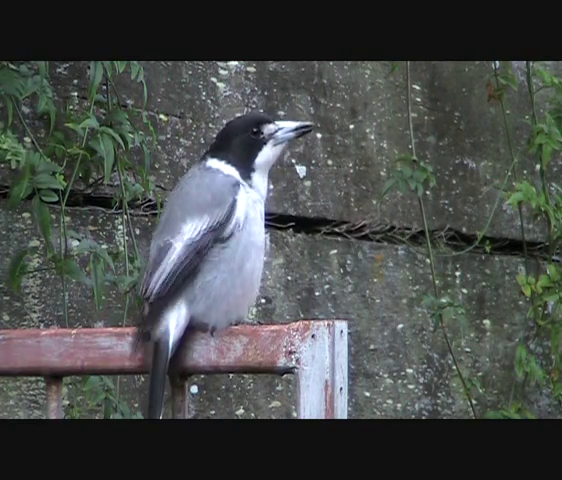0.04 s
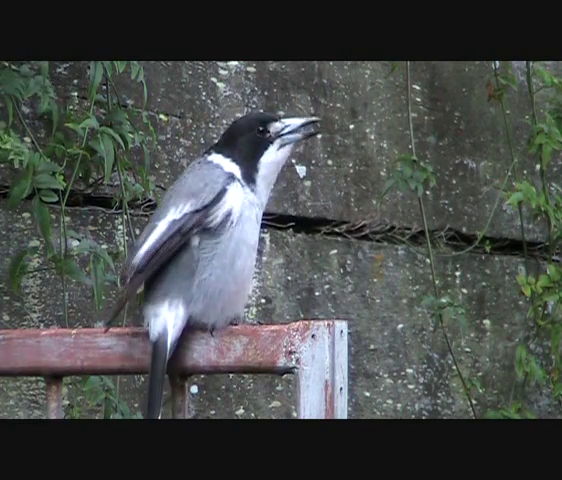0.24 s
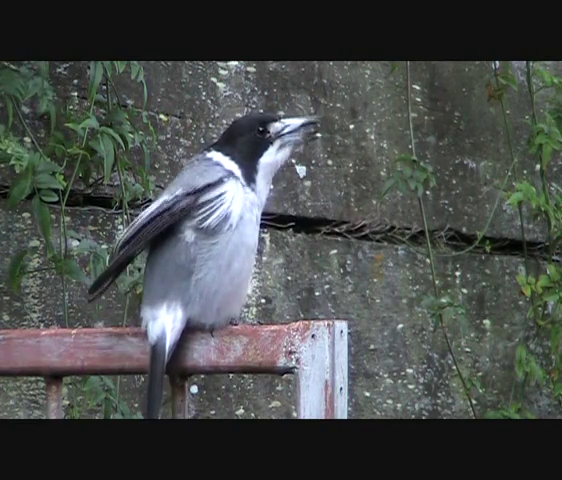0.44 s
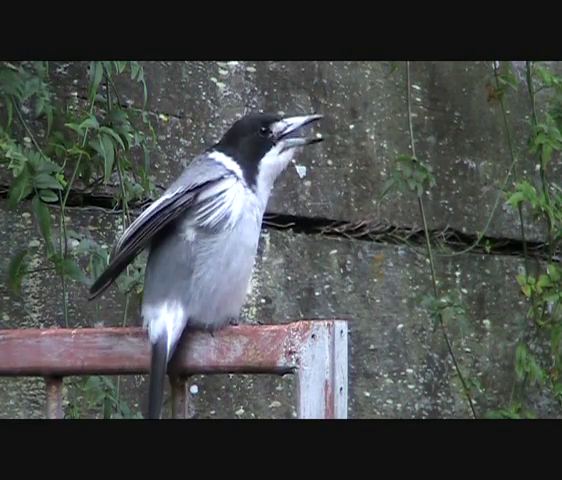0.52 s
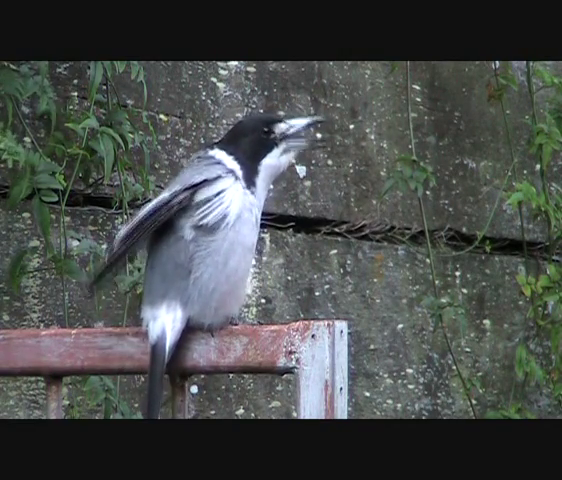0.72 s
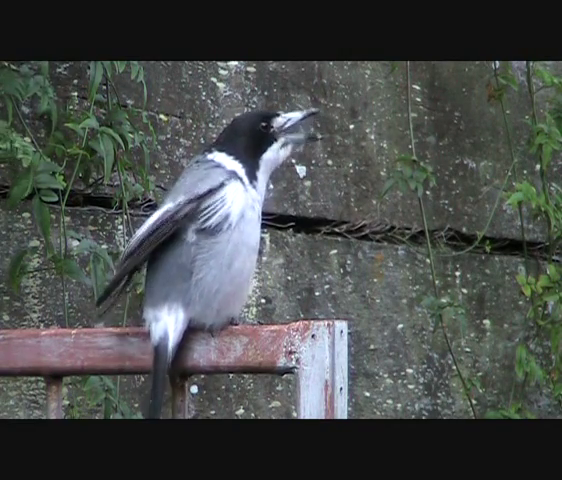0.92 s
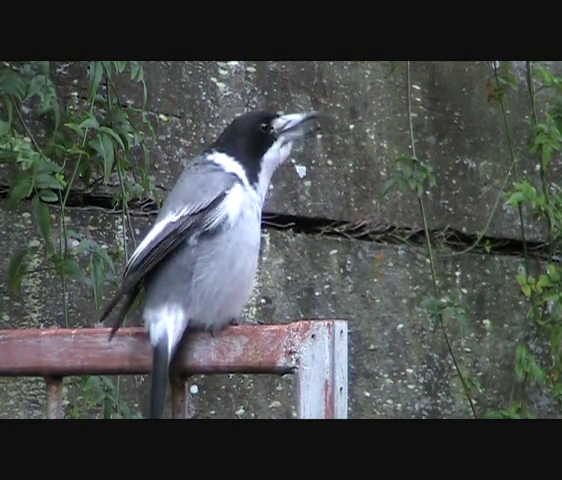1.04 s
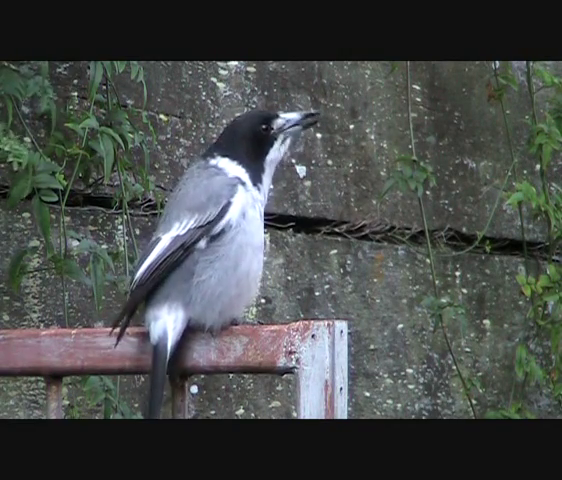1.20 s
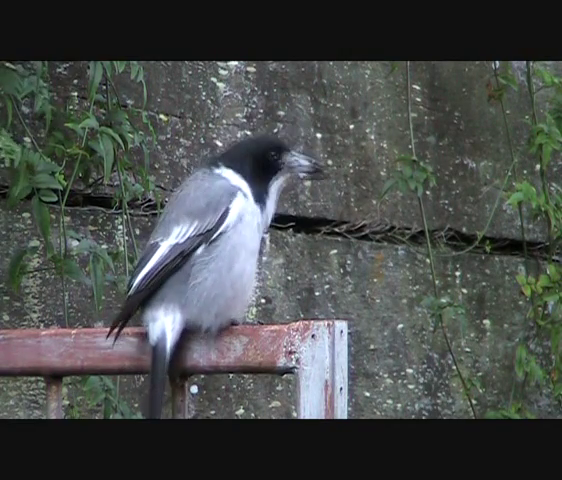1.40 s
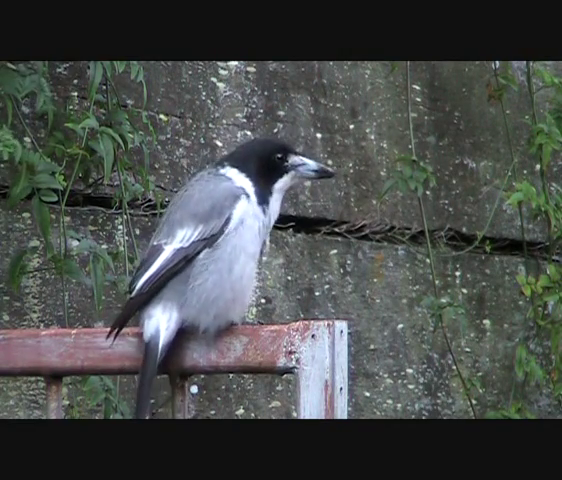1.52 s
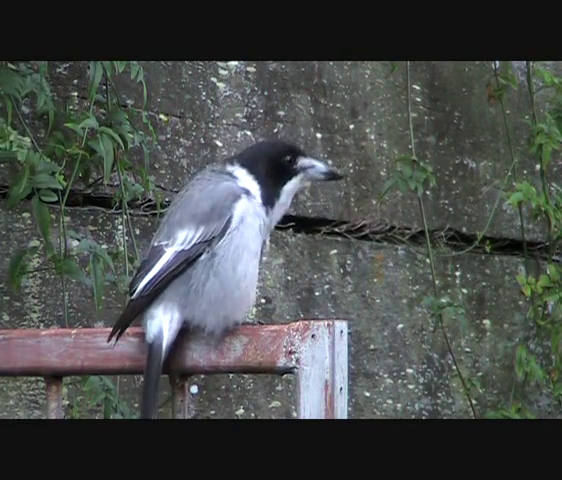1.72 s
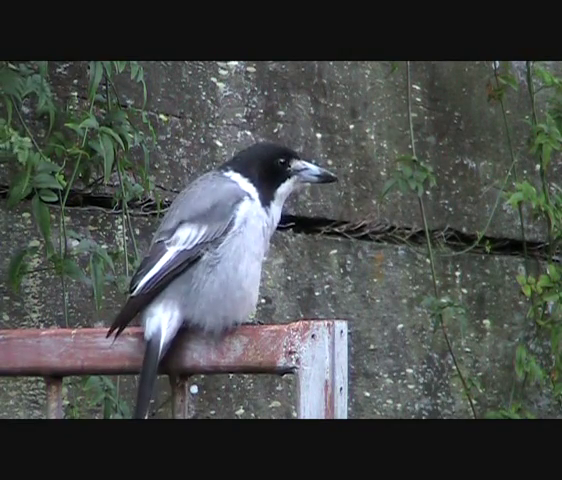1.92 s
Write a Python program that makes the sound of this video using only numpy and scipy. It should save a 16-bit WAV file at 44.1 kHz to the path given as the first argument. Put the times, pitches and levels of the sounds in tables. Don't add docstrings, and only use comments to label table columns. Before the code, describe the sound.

A butcherbird calls a few metres away. A rough rasp climbs from 0.2 to 0.45 seconds, another follows at 0.55 to 0.72, then four sharp, higher yelps run from 0.8 to 1.2. After a pause, a soft low whistle sounds at 1.45 to 1.6, and a higher one at 1.7 falls into a faint chuckle by 1.9. Short wall reflections, leaf hiss, distant traffic rumble and faint whines throughout.

```python
import sys
import numpy as np
from scipy import signal
from scipy.fft import rfft, irfft, next_fast_len
from scipy.io import wavfile
from scipy.ndimage import uniform_filter1d, minimum_filter1d, map_coordinates

SR = 44100
rng = np.random.default_rng(int(sys.argv[2]) if len(sys.argv) > 2 else 0)


def digitize_waveform(pressure):
    field = np.atleast_2d(pressure).T
    bounded = np.clip(field, -1, 1)
    quanta = np.round(bounded * 32767).astype(np.int16)
    wavfile.write(sys.argv[1], SR, quanta)


def boost(x):
    u = np.asarray(x, float) / 20
    return 10 ** u


N = 85995
TOP_HZ = 15770


def unit(x):
    return x / np.sqrt(np.mean(x ** 2) + 1e-20)


def along(points, hz):
    f, v = np.transpose(points)
    return np.interp(np.log(hz + 1), np.log(f + 1), v)


def wobble(rate, size):
    knots = rng.standard_normal(int(size * 2 * rate / SR) + 8)
    return map_coordinates(knots, [np.arange(size) * rate / SR])


def complex_wobble(rate, size):
    return wobble(rate, size) + 1j * wobble(rate, size)


def filtered(x, response):
    m = next_fast_len(x.shape[-1] + 8192)
    return irfft(rfft(x, m) * response(np.fft.rfftfreq(m, 1 / SR)), m)[..., :x.shape[-1]]


def spread(first, second, likeness):
    def shares(hz):
        angle = np.arccos(np.clip(along(likeness, hz), -1, 1)) / 2
        return np.array([np.cos(angle), np.sin(angle)])
    mid, side = filtered(np.array([first, second]), shares)
    return np.array([mid + side, mid - side])


# (time [s], pitch [Hz], level [dB], overtone lift [dB], roughness [0-1])
RASP_1 = [(.2, 616, -38, -15.5, .6), (.226, 639.6, -23.5, -15, .6), (.238, 702.3, -20.5, -6.5, .35),
          (.258, 738.9, -24, -5.5, .3), (.29, 734.8, -18, -4, .22), (.305, 747.9, -15.5, -5, .2),
          (.33, 804.6, -23, 5.5, .6), (.356, 814.1, -13, -2, 0.2), (.375, 814.5, -12, -6.5, .2),
          (.383, 827.3, -16.5, 7, 0.31), (.391, 838.3, -11, 0.5, .2), (.412, 854.9, -10.5, 3.5, 0.4),
          (.426, 888.9, -12, 4, .3)]
RASP_1_END = [(.424, 1064, -15, 1.5, 0.33), (.432, 1070, -16, 1.8, 0.187), (0.446, 1111, -24.5, 7.6, 0.6)]
RASP_2 = [(.556, 925.8, -23.5, 0.25, 0.258), (.566, 901.8, -16.5, -0.14, 0.2525),
          (.58, 867.2, -14, 2.45, 0.3775), (0.601, 838.1, -14.5, 1.43, 0.3964),
          (0.612, 857.3, -15, 1.86, 0.399), (.62, 884, -12.5, -1.5, 0.227), (0.632, 895.6, -14, 2.5, 0.24),
          (0.643, 910.7, -12, 0.39, 0.2595), (0.664, 947.7, -11, -2.44, 0.237),
          (.676, 952.2, -12.5, -0.56, 0.291)]
RASP_2_END = [(0.667, 1040, -33, -10, 0.158), (0.68, 1077, -10.5, -5, 0.1496),
              (0.696, 1149, -17.5, 6, 0.199), (.702, 1052, -16, 5, 0.941), (0.718, 949, -21.5, 4, 0.982)]
YELP_UP = [(.793, 1029, -29.5, -11, 0.208), (.809, 1074, -17.5, -6.5, 0.291), (.817, 1395, -14, 0, 0.298),
           (.826, 1532, -10.5, 7.5, 0.51), (.834, 1598, -19.5, -3.5, 0.374)]
YELP_TOP = [(.822, 1964, -20, 8, 0.184), (.834, 2095, -14, 3, 0.191), (.845, 2349, -15.5, 6, 0.368),
            (0.855, 2458, -18, 7.5, 0.161), (.866, 2415, -24, -1, 0.18), (0.884, 2385, -27, -4, 0.153)]
YELP_FLAT = [(.906, 2236, -32.5, -8, 0.111), (.913, 2275, -19.5, -3.5, 0.101),
             (.92, 2252, -24, -1.5, 0.115), (0.93, 2244, -9.5, -5.5, 0.0386),
             (.939, 2296, -17.5, 7.5, 0.071), (.946, 2312, -18.5, 4.5, 0.071),
             (.957, 2300, -19.5, 4, 0.064), (0.967, 2326, -39, 5.5, 0.0854)]
YELP_DOWN = [(1.005, 2227, -28, -12.5, 0.098), (1.013, 2162, -14.5, -10.5, 0.1),
             (1.019, 2379, -25, 2.5, 0.111), (1.027, 2386, -17.5, -0.5, 0.14),
             (1.032, 2230, -15, -3.5, 0.091), (1.039, 2228, -20.5, 2, 0.17)]
YELP_DROP = [(1.036, 1998, -16.5, 3.5, 0.253), (1.046, 1938, -13.5, 2, 0.18), (1.054, 1904, -8, -3, 0.167),
             (1.061, 1780, -1.5, -4, 0.085), (1.069, 1766, -19, -5.5, 0.092),
             (1.074, 1875, -14, -7.5, 0.119), (1.089, 1729, -22.5, 1, 0.102)]
YELP_LAST = [(1.138, 1023, -36, 1.5, 0.395), (1.146, 1051, -24, -14, 0.319), (1.165, 1135, -21, 1, 0.637),
             (1.179, 1429, -12.5, -1.5, 0.49), (1.19, 1484, -11.5, -1, 0.36), (1.198, 1600, -7, -7, 0.465),
             (1.206, 1751, -15.5, -11, 0.727), (1.216, 1723, -20, -9.5, .8)]
WHISTLE_LOW = [(1.445, 722, -43.5, -32.5, 0.027), (1.466, 764.1, -30.5, 5, 0.0055),
               (1.492, 745.6, -24.5, -16, 0.0026), (1.506, 756.5, -23, -41.5, 0.0117),
               (1.538, 800.4, -17, -24, 0.0036), (1.572, 809.7, -18.5, -28.5, 0.0045),
               (1.592, 792, -18.5, -25, 0.0034), (1.608, 744.1, -34.5, -51, 0.0029)]
WHISTLE_HIGH = [(1.708, 1036, -45, 4.5, 0.597), (1.721, 1036, -18.5, -15.5, .4),
                (1.73, 1074, -10.5, -27, 0.023), (1.743, 1070, -10, -24, .007),
                (1.75, 1064, -10.5, -20.5, .007), (1.759, 1052, -16, -20, .007),
                (1.773, 1053, -12, -24.5, .007), (1.783, 1076, -22.5, -11, .01),
                (1.795, 1068, -34.5, -15.5, 0.025)]
CHUCKLE = [(1.79, 1076, -33, -32, 0.55), (1.803, 1129, -24.5, -26, 0.73), (1.815, 1082, -27.5, -21.5, 1),
           (1.83, 1031, -34, -21.5, 1), (1.85, 963.5, -28.5, -30, 0.76), (1.86, 868.7, -29.5, -18, 1),
           (1.874, 780.2, -27, -29, 0.72), (1.885, 755, -30.5, -35, 0.837), (1.893, 762, -37.5, -35.5, 0.6)]
# (frequency [Hz], gain [dB])
RASP_THROAT = [(900, -17.5), (1700, 6), (2600, -5.5), (3300, -19.5), (4600, -19.5), (5700, -17),
               (10000, -16), (15000, -19.5)]
OPEN_BEAK = [(1000, -11), (1700, 2), (2400, -7.5), (3500, -16), (4700, -8.5), (5700, -20.5), (7200, -12),
             (15000, -21.5)]
SHUT_BEAK = [(700, -10.5), (1550, 1), (2300, -3), (4000, -55.5), (6400, -47.5), (7400, -32), (8600, -55),
             (14000, -47.5)]
PURSED_BEAK = [(1000, -1.5), (2130, -6), (3200, -13), (5300, -12.5), (6400, -4), (7500, -17.5),
               (10000, -16), (15000, -5.5)]


def bird():
    sound = np.zeros(N)
    for rows in (RASP_1, RASP_1_END, RASP_2, RASP_2_END):
        sound += call(rows, RASP_THROAT, lift_from_hz=4300, follow=0.434, odd=0.6)
    for rows in (YELP_UP, YELP_TOP, YELP_FLAT, YELP_DOWN, YELP_DROP, YELP_LAST):
        sound += call(rows, OPEN_BEAK, lift_from_hz=3300)
    sound += call(WHISTLE_LOW, SHUT_BEAK, lift_from_hz=920, lift_to_hz=4000)
    for rows in (WHISTLE_HIGH, CHUCKLE):
        sound += call(rows, PURSED_BEAK, lift_from_hz=1410)
    return filtered(sound, windpipe)


def call(rows, throat, lift_from_hz, follow=0, odd=0, lift_to_hz=TOP_HZ):
    s, *cols = np.transpose(rows)
    start, end = s[0], s[-1]
    t = np.arange(N)[round(start * SR):round((end + .03) * SR)] / SR
    n = len(t)
    pitch, level_db, lift_db, rough = [np.interp(t, s, c) for c in cols]
    rough = np.clip(rough, 0, .99)
    jitter = 0.02436 * np.sqrt(rough) * wobble(500, n)
    phase = 2 * np.pi * np.cumsum(pitch * (1 + jitter)) / SR
    k = np.arange(1, 23)[:, None]
    gains = overtone_gains(k, pitch, throat, follow, lift_db, lift_from_hz, lift_to_hz)
    tones = gains * np.real(blur(k, pitch, rough, odd) * np.exp(1j * k * phase))
    voice = tones.sum(0) / np.sqrt((gains ** 2).sum(0) / 2)
    breath_db = -6 + np.minimum(lift_db, 0)
    voice = voice + rough * boost(breath_db) * breath(n, throat, pitch.min())
    flutter_db = 1 * np.sqrt(rough) * wobble(136.6, n)
    attack_s, release_s = .004, 0.00742
    gate = np.clip((t - start) / attack_s, 0, 1) * np.exp(-np.maximum(t - end, 0) / release_s)
    sound = gate * boost(level_db + flutter_db) * voice
    return np.pad(sound, (round(start * SR), N))[:N]


def overtone_gains(k, pitch, throat, follow, lift_db, lift_from_hz, lift_to_hz):
    hz = k * pitch
    slope_db = -3.5 * np.log2(k)
    lifted = np.clip((hz - lift_from_hz) / 300, 0, 1) * (hz < lift_to_hz)
    throat_db = along(throat, hz * (877 / pitch) ** follow)
    return boost(throat_db + slope_db + lift_db * lifted) * (hz < TOP_HZ)


def blur(k, pitch, rough, odd):
    is_odd = k % 2
    wider = 1 + rough.mean() * (k * pitch.mean() / 1450) ** 2
    rates = np.minimum(170 * wider * (1 + odd * 0.3 * is_odd), 2500)
    smear = np.array([complex_wobble(r, len(rough)) for r in rates[:, 0]]) / np.sqrt(2)
    clear = (1 - rough) ** (k ** 1.15) * (1 - np.clip(odd, 0, 1) * is_odd)
    return np.sqrt(clear) + np.sqrt(1 - clear) * smear


def breath(n, throat, lowest_hz):
    def shape(hz):
        return boost(along(throat, hz) - 3.5 * np.log2(hz / 800 + 1)) * (hz > 0.8 * lowest_hz)
    return unit(filtered(rng.standard_normal(n), shape))


# (centre [Hz], width [Hz], gain [dB])
PIPE = [
    (4300, 1500, -7),
    (6000, 600, 8),
    (7700, 600, 9),
    (9800, 600, 6),
    (15500, 3000, -10),
]


def windpipe(hz):
    return boost(sum(db / (1 + (2 * (hz - centre) / width) ** 2) for centre, width, db in PIPE))


# (frequency [Hz], left-right likeness [-1 to 1])
VOICE_ALIKE = [(1500, 0.99), (3000, 0.807), (6000, 0.61), (10000, 0.317), (14000, -0.37)]


def ports(x):
    t = np.arange(SR // 16) / SR
    scatter_s = .06
    burst = rng.standard_normal(len(t)) * boost(-60 * t / scatter_s)
    scattered = signal.fftconvolve(x, burst / np.linalg.norm(burst))[:N]
    pan_db = -0.26
    return spread(x, scattered, VOICE_ALIKE) * boost([[pan_db], [-pan_db]])


# (frequency [Hz], time to fade by 60 dB [s])
YARD_FADE = [(700, 0.2966), (1700, 0.338), (3000, 0.2693), (7000, 0.2756), (12000, 0.1726)]
# (frequency [Hz], level [dB])
YARD_LEVEL = [(800, -1.5), (1500, 0.96), (6000, 1.07), (12000, -0.5)]


def yard(x):
    level_db, delay_s, alike = -8.5, .006, 0.774
    hz, t, z = signal.stft(rng.standard_normal((2, SR // 2)), SR, nperseg=256)
    fade_db = along(YARD_LEVEL, hz)[:, None] - 60 * t / along(YARD_FADE, hz)[:, None]
    a, b = signal.istft(z * boost(fade_db), SR, nperseg=256)[1]
    angle = np.arccos(alike) / 2
    mid, side = np.cos(angle) * a, np.sin(angle) * b
    tail = np.array([mid + side, mid - side])
    tail = boost(level_db) * tail / np.linalg.norm(tail[0])
    tail = np.pad(tail, ((0, 0), (round(delay_s * SR), 0)))
    return signal.fftconvolve(x[None], tail, axes=1)[:, :N]


# (frequency [Hz], level [dB per Hz])
RUMBLE = [(13, -56.5), (22, -9.5), (64, 1), (112, -3), (208, -9), (242, -6), (312, -9.5), (450, -12),
          (580, -79.5), (990, -120)]
# (time [s], level [dB])
TRAFFIC = [
    (0, 1.5),
    (.9, 1.5),
    (1.6, 0),
    (1.95, 1),
]


def traffic():
    swell_db = np.interp(np.arange(N) / SR, *np.transpose(TRAFFIC))
    return boost(-48.5 + swell_db + 1.2 * wobble(3.05, N)) * rush(RUMBLE)


# (frequency [Hz], level [dB per Hz])
AIR = [(400, -30), (470, -13.5), (700, -11.5), (1700, -14), (2500, -21), (5000, -27.5), (9000, -38.5),
       (15000, -43.5)]


def leaves():
    return boost(-46 + 1.2 * wobble(8.747, N)) * rush(AIR)


# (frequency [Hz], left-right likeness [-1 to 1])
AIR_ALIKE = [(40, 0.93), (90, 0.844), (180, 0.73), (350, 0.43), (1500, 0.8), (8000, .1)]


def rush(spectrum):
    noise = filtered(rng.standard_normal((2, N)), lambda hz: boost(along(spectrum, hz)))
    middle = filtered(noise[0], lambda hz: np.cos(np.arccos(along(AIR_ALIKE, hz)) / 2))
    return spread(*noise, AIR_ALIKE) / np.std(middle)


# (frequency [Hz], level [dB])
DRONES = [
    (655, -51.5),
    (1618, -49.5),
]


def whines():
    t = np.arange(N) / SR
    return sum(boost(db) * np.real(complex_wobble(14, N) * np.exp(2j * np.pi * hz * t)) for hz, db in DRONES)


def scene():
    voice = bird()
    background = (traffic() + leaves()) * boost([[.45], [-.45]]) + whines()
    return ports(voice) + yard(voice) + background


def top_cut(x):
    return signal.sosfilt(signal.butter(12, 15770, fs=SR, output="sos"), x)


def record(dry):
    ceiling = .88
    need = np.minimum(1, ceiling / (np.abs(dry).max(0) + 1e-9))
    gain = uniform_filter1d(minimum_filter1d(need, size=200), size=200)
    mix = filtered(dry * gain, lambda hz: hz < TOP_HZ)
    return top_cut(mix)


dry = scene()
out = record(dry)
digitize_waveform(out)
```